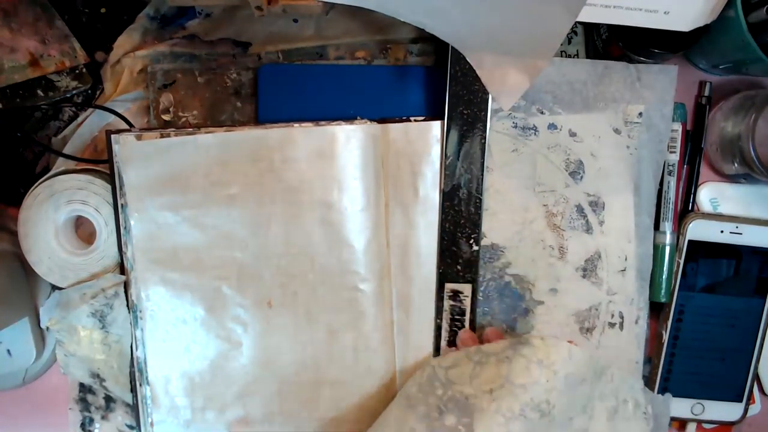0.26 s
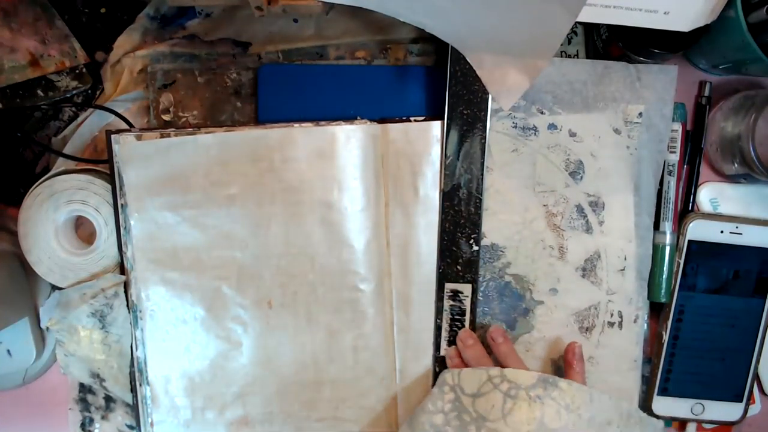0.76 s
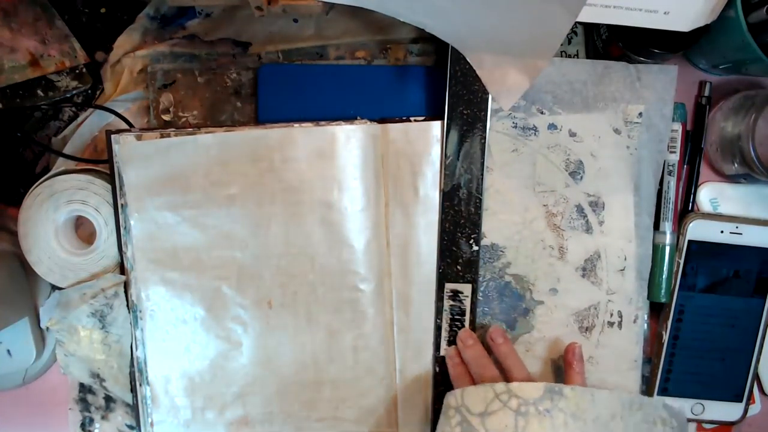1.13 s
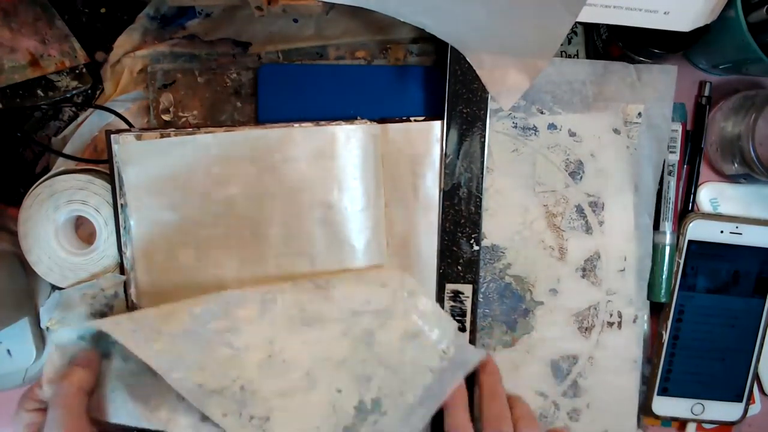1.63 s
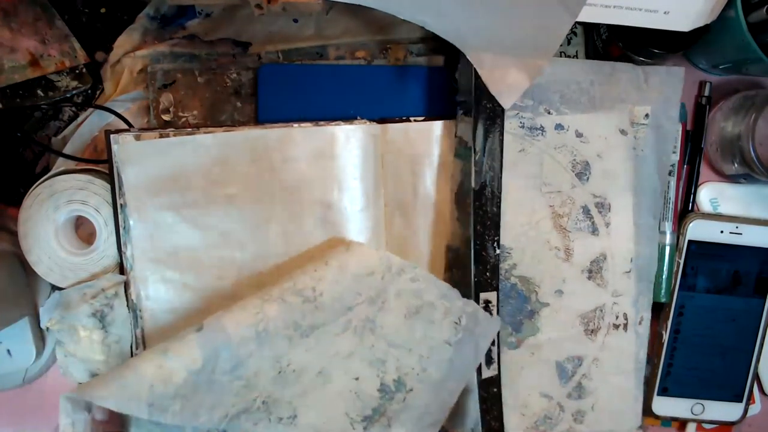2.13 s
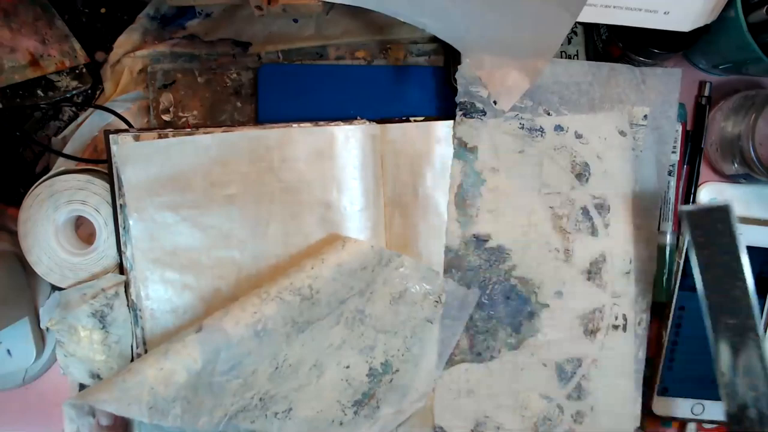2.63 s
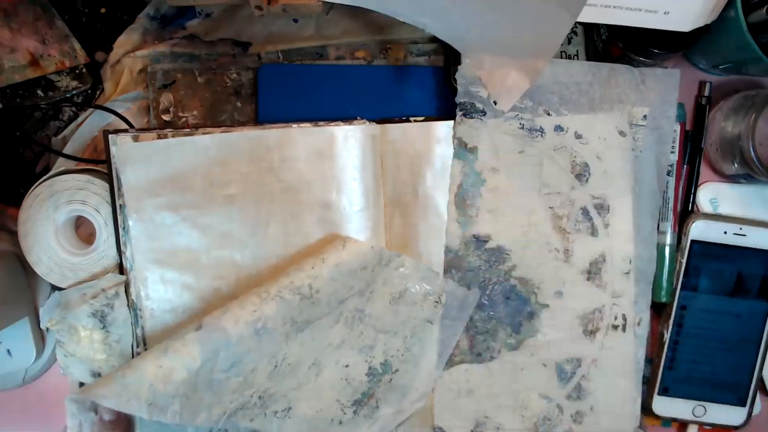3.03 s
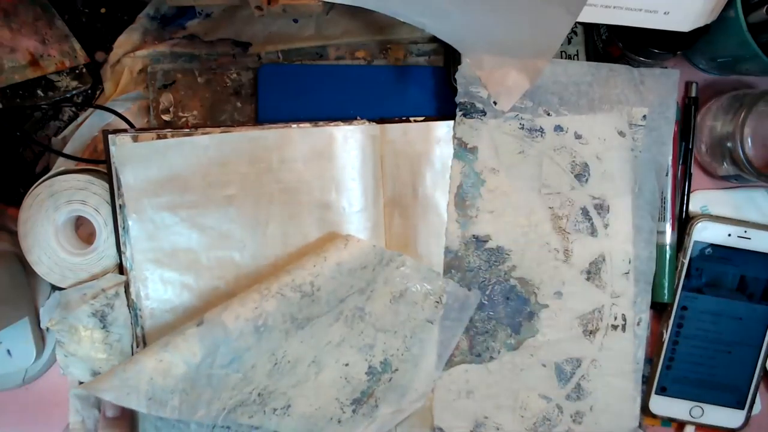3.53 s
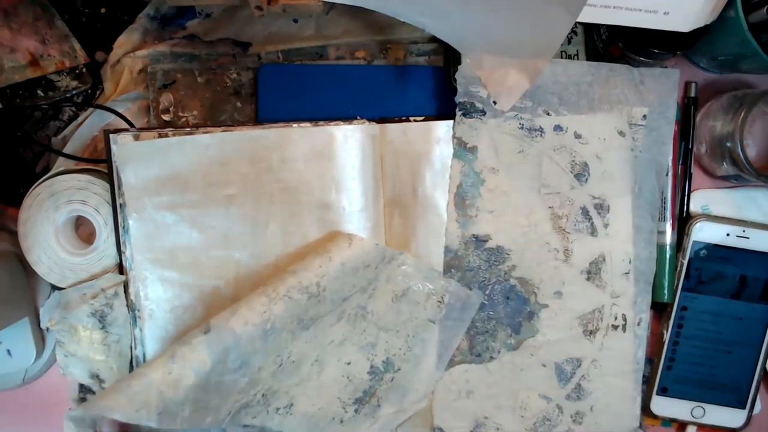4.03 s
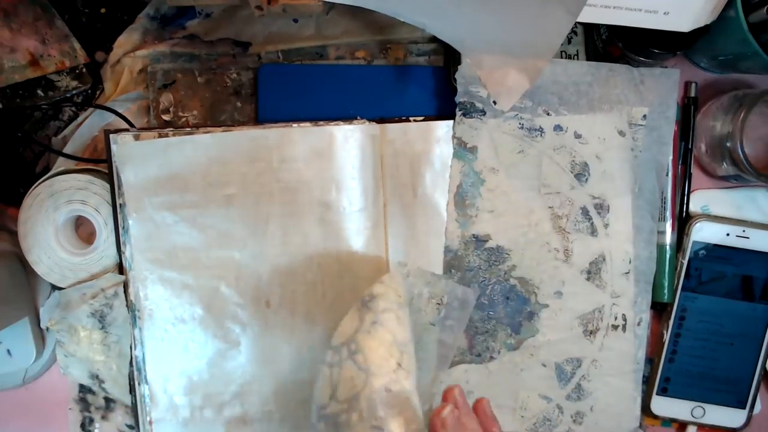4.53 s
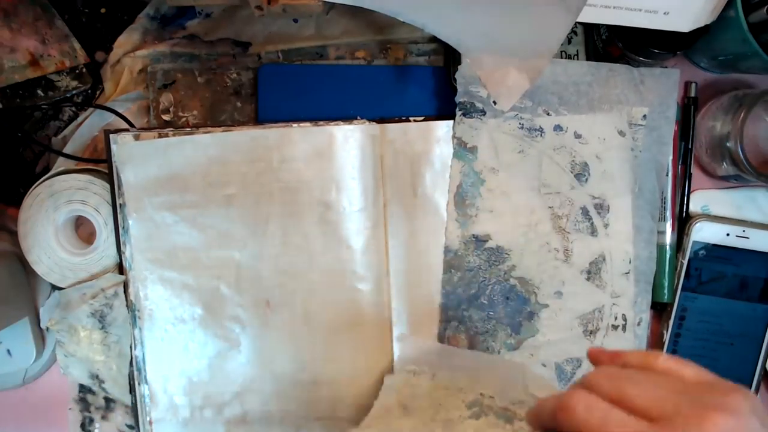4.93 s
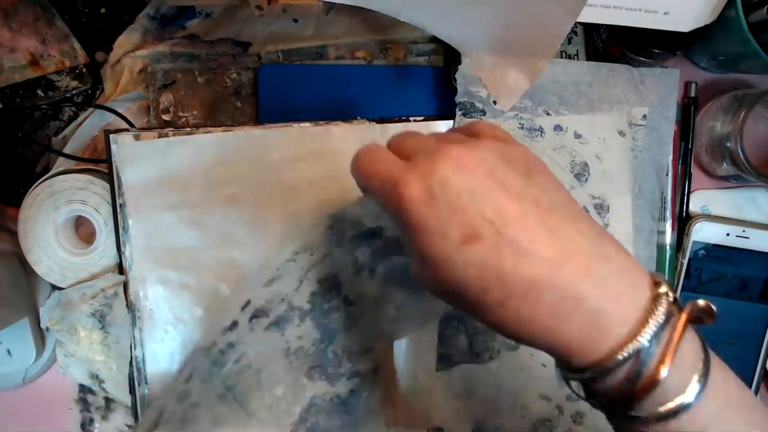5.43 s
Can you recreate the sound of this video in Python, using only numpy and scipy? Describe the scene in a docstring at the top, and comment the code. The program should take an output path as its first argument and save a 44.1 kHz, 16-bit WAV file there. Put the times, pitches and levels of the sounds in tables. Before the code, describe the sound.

A close microphone picks up work at a craft table in a small, dry room, with a very faint steady hush beneath. From 0 to 0.5 s thin paper rustles as it is gripped. At about 0.55 s comes the loudest moment, a crisp, snapping rip; after a light crackle near 0.8 s, a second tear arrives in quick bursts from 1.1 to 1.25 s. Soft rustling at 1.35 to 1.9 s lays the sheet aside. Faint metallic ticks appear from 2.1 s, with a small hollow bump and rustle near 2.4 s. Between 2.95 and 3.85 s a metal ruler rattles and scrapes down into a glass jar, clacking and ringing brightly, strongest around 3.27 s, then fading in scattered taps. It is nearly quiet until 4.5 s, when the sheet sweeps round, crackling sharply at 4.7 s. From 5.0 to 5.6 s it slides over the table in soft, breathy swishes.

```python
"""A sheet of thin paper rustles as it is gripped and bent, and is torn along a metal ruler in two short pulls.
The sheet is laid aside, things slide and bump on the table, and the ruler rattles down into a ringing glass jar.
Last, the loose sheet is swept round and slid across the table; a faint hush lies under it all in a small, dry room.
Paper is made of tiny random clicks, rubbing noise and short chirps, shaped by strokes of the hand.
Ruler, jar and table are sets of dying tones, with puffs of noise for the clacks and thuds."""
import sys
import numpy as np
from scipy import signal
from scipy.fft import rfft, irfft
from scipy.io import wavfile
from scipy.ndimage import uniform_filter1d

SR = 44100
rng = np.random.default_rng(int(sys.argv[2]) if len(sys.argv) > 2 else 0)


def master_out(mix):
    """Clip the mix to full scale and print it as 16-bit PCM to the path in sys.argv[1]."""
    frames = np.transpose(np.atleast_2d(mix))
    ceiling = np.clip(frames, -1, 1)
    pcm = np.round(ceiling * 32767).astype(np.int16)
    wavfile.write(sys.argv[1], SR, pcm)


N = 249606  # length of the scene in samples

# Levels in the tables are starting points: each layer adds its own trim in dB.
# "t60" is the time a sound takes to fall by 60 dB.

# colour of the faint background hush: (frequency [Hz], level per Hz [dB])
HUSH_COLOUR = [(18, -80), (30, -49), (86, -7.5), (121, -8.5), (287, -4.5), (319, -8), (461, -7.5),
               (526, -20), (1540, -11.5), (4780, -28.5), (16000, -37)]
# strokes that grip, bend and lay aside the sheet:
# (start [s], rise [s], hold [s], crackle [dB], flapping re crackle [dB], fibre fizz re crackle [dB])
RUSTLE_STROKES = [(0.0, 0.001, 0.02, -48, -28, -4), (0.234, 0.0097, 0.044, -34.5, -20, -13),
                  (0.338, 0.0056, 0.034, -33, -36, -19.5), (0.372, 0.047, 0.0057, -23.5, -24, -14.5),
                  (0.799, 0.019, 0.0079, -27, -49, -8.5), (0.975, 0.032, 0.011, -60, -24, -11),
                  (1.021, 0.0091, 0.0064, -37.5, -30, -3.5), (1.060, 0.02, .015, -48, -25.5, -2.5),
                  (1.345, .012, .01, -46.5, -41, 3.5), (1.365, 0.0085, 0.021, -37, -54, -10.5),
                  (1.448, 0.044, 0.015, -26.5, -29, -10), (1.490, 0.018, 0.054, -40.5, -44, -1.5),
                  (1.620, 0.017, 0.0027, -51, -19, -3), (1.688, 0.014, 0.074, -41, -30, -13.5),
                  (1.855, 0.019, 0.0045, -51, -26, -10), (2.425, 0.023, .015, -34, -25.5, -7)]
# colour of the rustling: (frequency [Hz], level per Hz [dB])
RUSTLE_COLOUR = [(35, -63.5), (60, -45.5), (146, -22), (315, -24), (1220, -6), (1340, -6), (1470, -6.5),
                 (1780, -2), (2650, 4.5), (2900, 0.5), (3580, 1.5), (5210, -3.5), (7570, -15), (10800, -16),
                 (16000, -24)]
# creases that snap over: (time [s], level [dB], centre pitch [Hz])
CREASE_SNAPS = [(0.01, -28.5, 3580), (0.236, -27.5, 1670), (0.35, -26, 3230), (0.549, -20, 1300),
                (0.575, -1, 2670), (0.606, -12, 3990), (0.739, -29, 3920), (0.902, -44.5, 4200),
                (1.034, -26, 2330), (1.05, -23, 1790), (1.176, -9.5, 1053), (1.184, -9, 2030),
                (1.358, -24.5, 6030), (1.371, -23, 5800), (1.452, -25, 4330), (1.553, -30, 5340),
                (1.627, -30, 2620), (1.706, -25, 2370), (2.551, -48, 5670), (2.659, -48, 5420),
                (4.179, -31.5, 5830), (4.3, -49, 3630), (4.513, -36, 7980), (4.599, -26.5, 1875),
                (4.687, -12.5, 4550), (4.72, -16.5, 1645), (4.943, -30.5, 1790), (5.136, -24.5, 5460),
                (5.53, -20, 3170)]
# pulls that rip the sheet:
# (start [s], rise [s], hold [s], crackle [dB], flapping re crackle [dB], fibre fizz re crackle [dB])
TEAR_STROKES = [(0.541, .010, 0.012, -21, -24.5, -12.5), (0.548, 0.02, 0.015, -14.5, -14, -15),
                (0.585, 0.014, 0.043, -16.5, -15, -4.5), (1.080, 0.027, 0.0046, -23.5, -16.5, -9),
                (1.158, 0.015, 0.025, -17.5, -14, -17), (1.195, 0.021, 0.0041, -16, -12.5, -5),
                (1.250, 0.0027, 0.0042, -19.5, -19, -6.5)]
# colour of the tearing: (frequency [Hz], level per Hz [dB])
TEAR_COLOUR = [(35, -57.5), (60, -37), (156, -12.5), (233, -16), (621, -12), (682, -17), (749, -7.5),
               (1440, -1.5), (1580, 0), (3940, -2.5), (5720, -7), (6280, -10), (7750, -11.5), (10300, -11),
               (16000, -21)]
# ruler and sheet slide over the table:
# (start [s], rise [s], hold [s], crackle [dB], flapping re crackle [dB], fibre fizz re crackle [dB])
SLIDE_STROKES = [(2.015, .015, 0.047, -73, -5.5, -19.5), (2.136, 0.0031, 0.0036, -55.5, -11, 5),
                 (2.235, 0.026, 0.053, -74.5, -6, 8), (2.493, .004, 0.003, -62.5, -26, 6),
                 (2.656, 0.0022, 0.0027, -70, -18, 16.5), (5.000, 0.027, .1, -46.5, -18.5, -16.5),
                 (5.130, .01, 0.11, -45.5, -23.5, -3), (5.180, 0.016, 0.073, -37, -27, -34),
                 (5.265, 0.026, 0.038, -35.5, -18, -24), (5.370, 0.031, 0.13, -40, -30.5, -11.5),
                 (5.560, 0.015, 0.032, -49, -18, -26)]
# colour of the sliding: (frequency [Hz], level per Hz [dB])
SLIDE_COLOUR = [(35, -63), (60, -72), (91, -39.5), (238, -29.5), (448, -43.5), (862, -36), (1170, -17.5),
                (1950, -2), (2470, 5), (3340, 2.5), (3670, 6), (5590, 3.5), (7750, -1.5), (11300, 4),
                (16000, -7)]
# main resonance of the air gap under the sliding sheet: (time [s], frequency [Hz])
GAP_PITCH = [(5.0, 3060), (5.08, 3750), (5.17, 3430), (5.25, 2720), (5.36, 2900), (5.45, 3110),
             (5.53, 3300), (5.66, 3430)]
# resonances of that gap: (factor on the main resonance [ratio], level [dB])
GAP_MODES = [(.4, -1.5), (1, 4.5), (1.75, 1)]
# the ruler knocks against things: (time [s], ring [dB], upper modes [dB], clack [dB],
# thud through the table [dB], pitch favoured by the point of contact [Hz])
RULER_KNOCKS = [(2.106, -28.5, -43.5, -67, -71, 2086), (2.151, -25.5, -57, -75, -78, 2125),
                (2.302, -37, -63, -71, -83, 2090), (2.658, -33.5, -68, -77, -73, 2367),
                (2.671, -36, -80, -82, -86, 1578), (2.949, -20.5, -26.5, -46.5, -39.5, 2100),
                (2.984, -31.5, -31, -73, -61.5, 2030), (3.084, -18.5, -13.5, -44.5, -68, 1995),
                (3.158, -27, -35, -80, -65, 2120), (3.176, -17.5, -25.5, -42, -58, 2370),
                (3.269, -11.5, -39.5, -26, -23, 2760), (3.324, -35, -46, -58, -38.5, 2000),
                (3.37, -14.5, -19.5, -40.5, -35, 1990), (3.511, -40, -30.5, -53, -71, 2000),
                (3.542, -19, -54, -34.5, -25, 1140), (3.602, -42, -32, -43, -62, 4500),
                (3.662, -58, -66, -56.5, -74, 4700), (3.705, -31.5, -68, -68, -57.5, 1845),
                (3.775, -18, -45, -56.5, -56, 2000), (3.821, -26, -40.5, -74, -51, 2008),
                (3.964, -56, -82.5, -85, -58, 1400), (4.142, -41.5, -59, -80, -81.5, 2000),
                (4.371, -53, -77, -89, -86, 2070)]
# ringing modes of the free ruler, before detuning and grip: (frequency [Hz], level [dB], t60 [s])
RULER_MODES = [(1097, -22, 0.11), (1313, -14, 0.13), (1648, -7.5, 0.081), (1946, -1, 0.088),
               (2026, -0.5, 0.11), (2240, -10.5, 0.22), (2470, -12, 0.16), (3493, -7, 0.099),
               (4530, -6, 0.037), (5100, -19.5, .08), (6220, -22.5, 0.1)]
# colour of a clack: (frequency [Hz], level per Hz [dB])
CLACK_COLOUR = [(300, -36), (700, -1.5), (1300, 7.5), (2500, 0), (5000, 1), (7000, -4.5), (11000, -11.5),
                (16000, -16.5)]
# colour of a thud: (frequency [Hz], level per Hz [dB])
THUD_COLOUR = [(30, -40), (70, -42), (110, -8.5), (160, 8), (240, 2.5), (390, -0.5), (600, -5),
               (1000, -5.5), (3000, -63)]
# modes of the table top under a knock: (frequency [Hz], level [dB], t60 [s])
TABLE_MODES = [(160, -10.5, .12), (337.6, -2.5, 0.11), (406.4, -2, 0.078), (742, -7, .1),
               (892, -6.5, 0.066), (1068, -6, 0.081), (1415, -5, 0.12)]
# the ruler scrapes over the table and down inside the jar: (start [s], rise [s], hold [s], level [dB])
SCRAPE_STROKES = [(2.15, 0.054, 0.077, -62.5), (3.082, 0.12, 0.066, -37.5), (3.305, .05, 0.029, -43),
                  (3.49, 0.026, 0.033, -49.5)]
# hollow bumps of things on the table: (time [s], level [dB], pitch [Hz])
TABLE_BUMPS = [(2.313, -66.5, 740), (2.425, -36.5, 867), (2.435, -31.5, 852), (2.931, -55.5, 535),
               (3.608, -49, 548), (3.672, -54, 801), (5.016, -41.5, 895), (5.03, -41, 843),
               (5.036, -44, 1340), (5.075, -48, 1414)]
# modes of one bump: (factor on its pitch [ratio], level [dB], t60 [s])
HOLLOW_MODES = [(.89, 4, .1), (1, 6, 0.12), (1.12, -1, .08), (1.42, -3, 0.059)]
# the ruler touches the glass:
# (time [s], ring [dB], hardness [dB per octave], time the ring takes to build [s])
GLASS_TOUCHES = [(3.179, -20, -4, 0.0026), (3.201, -16.5, -25, 0.0068), (3.238, -23.5, -13, 0.014),
                 (3.272, -10, 1, 0.00092), (3.324, -24.5, -3, 0.012), (3.379, -31, -6, .004),
                 (3.442, -28, -37, 0.042), (3.722, -51.5, -35, .012), (3.818, -40, -26, 0.0057),
                 (3.865, -38.5, -32, 0.011)]
# ringing modes of the jar: (frequency [Hz], level [dB], t60 [s])
JAR_MODES = [(400, -23, 0.13), (2727, 0.5, 0.13), (4650, -9, 0.055), (4910, -26, 0.1), (6660, -5, 0.095),
             (6850, -22, 0.14), (9700, -38.5, .09)]
# strokes that sweep the sheet round:
# (start [s], rise [s], hold [s], crackle [dB], flapping re crackle [dB], fibre fizz re crackle [dB])
SWEEP_STROKES = [(4.168, 0.0087, .015, -48.5, -33.5, -15.5), (4.425, 0.023, .005, -53.5, -22, 4.5),
                 (4.520, 0.054, 0.026, -51.5, -16, -10.5), (4.590, 0.0097, 0.16, -37.5, -33, -14),
                 (4.655, 0.017, 0.012, -26, -14, -15), (4.681, 0.0053, .008, -21.5, -13, -11.5),
                 (4.700, 0.024, 0.011, -29.5, -14, -9.5), (4.750, 0.018, 0.15, -38, -23, -10),
                 (4.930, 0.005, 0.0031, -39.5, -40, -4)]
# colour of the sweeping: (frequency [Hz], level per Hz [dB])
SWEEP_COLOUR = [(35, -51), (60, -32), (146, -25), (315, -23), (469, -20.5), (682, -22), (1150, 2),
                (1750, 11), (2410, 13), (2970, 18.5), (3760, 12), (4420, 10.5), (7570, -15.5), (9570, -17),
                (14900, -26), (16000, -27)]
# colour of the table top and microphone: (centre [Hz], width [Hz], level [dB])
TABLE_AND_MIC_COLOUR = [(171, 6, 2), (202.2, 19, -1.5), (640, 15, -2.5), (1040, 160, 2), (7650, 550, -6)]

HUSH_DB = -73
SAG_DB_PER_S, RELEASE_DB_PER_S = 41, 390.5  # fall while a stroke is held, and after it
FLAP_LAG_S, FIZZ_RELEASE_DB_PER_S = .006, 459  # the whole sheet follows late; the finest fibres stop first
GRIP = 0.87  # share of its ring time that the hand leaves the ruler
SEAT_S, EDGE_DB, EDGE_CLACK_DB = .007, -11.5, -4.5  # an edge meets first, full landing comes SEAT_S later
FRAME = 512  # samples in one short slice of spectrum
FRAME_HZ = np.fft.rfftfreq(FRAME, 1 / SR)
AGE = np.arange(SR // 2) / SR  # seconds since a sound began


def amp(db):
    """Turns decibels into a plain multiplier."""
    return 10 ** (np.asarray(db) / 20)


def evened(x):
    """Scales x to unit power."""
    return x / np.sqrt(np.mean(abs(x) ** 2) + 1e-20)


def read(points, hz):
    """Reads a colour curve at any frequency, with straight lines over log frequency."""
    f, value = np.transpose(points)
    return np.interp(np.log(hz + 1), np.log(f), value)


def add(mix, s, sound):
    """Adds a sound to the mix from time s, cut off at the end of the mix."""
    part = mix[max(round(s * SR), 0):][:len(sound)]
    part += sound[:len(part)]


def tinted(x, colour):
    """Multiplies the spectrum of x by a colour curve, then sets unit power."""
    gain = amp(read(colour, np.fft.rfftfreq(len(x), 1 / SR)))
    return evened(irfft(rfft(x) * gain, len(x)))


def band(x, lo_hz, hi_hz):
    """Keeps one band of x, its power held steady over a few hundredths of a second."""
    sos = signal.butter(4, [lo_hz, hi_hz], "band", fs=SR, output="sos")
    y = signal.sosfilt(sos, x)
    return y / np.sqrt(uniform_filter1d(y ** 2, size=1500) + 1e-12)


def stroke(rise, hold, release_db_per_s):
    """Loudness of one stroke of the hand: it swells, sags while held, and dies away."""
    sag_db = SAG_DB_PER_S * np.clip(AGE - rise, 0, hold)
    release_db = release_db_per_s * np.maximum(AGE - rise - hold, 0)
    return np.minimum(AGE / rise, 1) ** 2 * amp(-(sag_db + release_db))


def burst(colour, rise, t60, ripple_db):
    """A puff of dense contacts that swells and dies, with chance resonances of its own."""
    spectrum = rfft(rng.standard_normal(len(AGE)))
    ripple = evened(uniform_filter1d(rng.standard_normal(len(spectrum)), size=140))
    noise = irfft(spectrum * amp(ripple_db * np.clip(ripple, -2, 2)), len(AGE))
    return tinted(noise, colour) * (1 - np.exp(-AGE / rise)) * amp(-60 * AGE / t60)


def ring(modes, mode_db, rise, flutter, flutter_hz):
    """Dying tones; reflections and rattling contact make each one flutter."""
    hz, db, t60 = np.transpose(modes)[:, :, None]
    knots = np.arange(256) / flutter_hz
    wobbles = rng.standard_normal((len(modes), 2, len(knots)))
    drift = np.array([np.interp(AGE, knots, a + 1j * b) for a, b in wobbles])
    tones = np.exp(2j * np.pi * (hz * AGE + rng.random(hz.shape)))  # random starting phase
    tones = tones * (1 + flutter * drift) / np.sqrt(1 + flutter ** 2)
    decay = amp(db + mode_db[:, None] - 60 * AGE / t60)
    return (tones.real * decay).sum(0) * (1 - np.exp(-AGE / rise))


def hush():
    """Steady coloured noise: the quiet background of the room."""
    return amp(HUSH_DB) * tinted(rng.standard_normal(N), HUSH_COLOUR)


def crinkles(per_s, t60, spread_db):
    """Small facets of the sheet buckle, each ringing briefly at a pitch of its own."""
    out, t = np.zeros(N), AGE[:SR // 15]
    gaps, pitches, sizes = rng.random((3000, 3)).T
    times = np.cumsum(2 * gaps / per_s)
    pitches_hz = 1200 * 7.5 ** pitches  # 1200 to 9000 Hz
    for s, hz, size in zip(times, pitches_hz, sizes):
        if s < N / SR:
            add(out, s, amp(spread_db * size - 60 * t / t60) * np.sin(2 * np.pi * hz * t))
    return evened(out)


def fibres(per_s, spread_db, rub, patchy_db, crinkle, glance):
    """Fibres break as clicks of uneven size, facets crinkle, and the bending sheet adds drifting resonances."""
    signs = rng.choice([-1., 1.], N)
    sizes = amp(spread_db * np.minimum(rng.exponential(1, N), 4))
    clicks = signs * sizes * (rng.random(N) < per_s / SR)
    rubbing = rub * rng.standard_normal(N)
    source = evened(clicks) + rubbing + crinkle * crinkles(per_s=170, t60=.05, spread_db=15)
    z = signal.stft(source, nperseg=FRAME)[2]
    # patches of pitch and time come out louder or softer by chance
    patches = uniform_filter1d(rng.standard_normal(z.shape), size=4, axis=0)
    patches = evened(uniform_filter1d(patches, size=10, axis=1))
    # sound glancing off the table arrives a little late; the delay wanders as the sheet moves
    knots = np.arange(0, z.shape[1] + 30, 30)
    delay_s = np.interp(np.arange(z.shape[1]), knots, rng.uniform(0.00036, 0.000903, len(knots)))
    comb = 1 + glance * np.exp(-2j * np.pi * FRAME_HZ[:, None] * delay_s)
    return signal.istft(z * comb * amp(patchy_db * patches))[1][:N]


def paper(strokes, colour, grain, crackle_db, flap_db, fizz_db):
    """Each stroke drives the crackle, the low flapping of the sheet and the fizz of the finest fibres."""
    grain = tinted(grain, colour)
    flap, crackle, fizz = band(grain, 50, 700), band(grain, 700, 7000), band(grain, 7000, 16500)
    crackle_power, flap_power, fizz_power = power = np.zeros((3, N))
    for start, rise, hold, level, low, high in strokes:
        shape = stroke(rise, hold, RELEASE_DB_PER_S)
        fizz_shape = stroke(rise, hold, FIZZ_RELEASE_DB_PER_S)
        add(crackle_power, start, (amp(level + crackle_db) * shape) ** 2)
        add(flap_power, start + FLAP_LAG_S, (amp(level + low + flap_db) * shape) ** 2)
        add(fizz_power, start, (amp(level + high + fizz_db) * fizz_shape) ** 2)
    return (np.sqrt(power) * [crackle, flap, fizz]).sum(0)


def rustling():
    """Gripping and bending: clicks of fibres with many ringing facets."""
    grain = fibres(per_s=3300, spread_db=3.0, rub=0.15, patchy_db=3.06, crinkle=.36, glance=0.3)
    return paper(RUSTLE_STROKES, RUSTLE_COLOUR, grain, crackle_db=-3, flap_db=0.5, fizz_db=1.5)


def snaps(crack_db, t60, ring_db, ring_t60):
    """A crease flips over with a short, broad crack and rings its patch of paper."""
    out = np.zeros(N)
    for s, db, hz in CREASE_SNAPS:
        colour = [(hz / 8, -35), (hz / 2, -13), (hz, 0), (hz * 2, -6), (hz * 5, -16)]
        crack = burst(colour, rise=0.00025, t60=t60, ripple_db=3.5)
        add(out, s, amp(db + crack_db) * crack)
        patch = [(hz, ring_db, ring_t60)]
        add(out, s, ring(patch, np.array([db]), rise=0.0028, flutter=3.4, flutter_hz=430))
    return out


def tearing():
    """Ripping: a dense run of breaking fibres, with little crinkling."""
    grain = fibres(per_s=2600, spread_db=2.0, rub=0.28, patchy_db=1.4, crinkle=0.062, glance=0.15)
    return paper(TEAR_STROKES, TEAR_COLOUR, grain, crackle_db=-1, flap_db=0, fizz_db=-0.5)


def resonate(x, hz, width_hz):
    """A resonance of gain 1 that follows the curve hz."""
    turn = np.exp(2j * np.pi * np.cumsum(hz) / SR)
    r = np.exp(-np.pi * width_hz / SR)
    # shift the pitch down to zero, smooth, and shift it back
    return 2 * (turn * signal.lfilter([1 - r], [1, -r], x / turn)).real


def air_gap(x, width_hz):
    """The gap under the sheet opens and closes, so its resonances glide together."""
    main_hz = np.interp(np.arange(N) / SR, *np.transpose(GAP_PITCH))
    out = x.copy()
    for factor, db in GAP_MODES:
        hz = factor * main_hz
        out += amp(db) * resonate(resonate(x, hz, width_hz), hz, width_hz)
    return out


def sliding():
    """Sliding over the table: strong rubbing noise coloured by the air gap."""
    grain = fibres(per_s=1800, spread_db=5.5, rub=1.0, patchy_db=0.0, crinkle=0.63, glance=0.11)
    rubbing = air_gap(grain, width_hz=560)
    return paper(SLIDE_STROKES, SLIDE_COLOUR, rubbing, crackle_db=1, flap_db=6, fizz_db=0)


def ruler(ring_db, upper_db, clack_db, thud_db, table_db, contact_db, focus_db, uneven_db, detune):
    """Each knock rings the ruler and clacks twice, edge first, and thuds through the table."""
    out = np.zeros(N)
    hz, db, t60 = np.transpose(RULER_MODES)
    for s, low, high, clack, thud, contact_hz in RULER_KNOCKS:
        # grip and point of contact shift the modes and share out the energy anew
        shift, share = rng.uniform(-1.2, 1, (2, len(hz)))
        modes = np.transpose([hz * (1 + detune * shift), db + uneven_db * share, t60 * GRIP])
        contact = [(contact_hz, contact_db, .055)]
        # below 3000 Hz, modes far from the contact pitch ring less
        favour_db = -focus_db * abs(np.log2(hz / contact_hz))
        drive_db = np.where(hz > 3000, high + upper_db, low + ring_db + favour_db)
        for at, landing_db, landing_clack_db in [(s, EDGE_DB, EDGE_CLACK_DB), (s + SEAT_S, 0, 0)]:
            add(out, at, ring(modes, drive_db + landing_db, rise=.004, flutter=1.0, flutter_hz=167))
            contact_level = np.array([low + landing_db])
            add(out, at, ring(contact, contact_level, rise=0.0013, flutter=0.39, flutter_hz=234))
            clack_noise = burst(CLACK_COLOUR, rise=0.0033, t60=0.078, ripple_db=4.0)
            add(out, at, amp(clack + clack_db + landing_clack_db) * clack_noise)
        add(out, s, amp(thud + thud_db) * burst(THUD_COLOUR, rise=0.012, t60=0.18, ripple_db=4.5))
        table_level = np.full(len(TABLE_MODES), thud + table_db)
        add(out, s, ring(TABLE_MODES, table_level, rise=.006, flutter=.94, flutter_hz=130))
    return out


def scrape(per_s, width_hz, release_db_per_s):
    """Tiny slips of the ruler's edge keep its modes stirred."""
    slips = rng.standard_normal(N) * (rng.random(N) < per_s / SR)
    body, pressure = np.zeros((2, N))
    for hz, db, _ in RULER_MODES:
        b, a = signal.iirpeak(hz, hz / width_hz, SR)
        body += amp(db) * signal.lfilter(b, a, signal.lfilter(b, a, slips))
    for start, rise, hold, db in SCRAPE_STROKES:
        add(pressure, start, amp(db) * stroke(rise, hold, release_db_per_s))
    return evened(body) * pressure


def bumps(level_db):
    """The table top and the things on it answer a bump with a short hollow note."""
    out = np.zeros(N)
    for s, db, hz in TABLE_BUMPS:
        modes = np.array(HOLLOW_MODES) * [hz, 1, 1]
        bump_db = np.full(len(modes), db + level_db)
        add(out, s, ring(modes, bump_db, rise=0.0027, flutter=0.99, flutter_hz=127.5))
    return out


def jar(level_db, flutter, flutter_hz):
    """Touches add energy to the ringing glass; harder ones wake more modes, grazing ones build slowly."""
    out, t = np.zeros(N), np.arange(N) / SR
    knots = np.arange(2048) / flutter_hz
    main_hz = JAR_MODES[1][0]
    for hz, mode_db, t60 in JAR_MODES:
        energy = np.zeros(N)
        for s, db, hardness, rise in GLASS_TOUCHES:
            # hardness counts per octave away from the main mode, up or down
            touch_db = db + mode_db + hardness * abs(np.log2(hz / main_hz))
            add(energy, s, (amp(touch_db - 60 * AGE / t60) * (1 - np.exp(-AGE / rise))) ** 2)
        a, b = rng.standard_normal((2, len(knots)))
        drift = np.interp(t, knots, a + 1j * b)
        tone = np.exp(2j * np.pi * hz * t) * (1 + flutter * drift)
        out += np.sqrt(energy) * tone.real
    return amp(level_db) * out


def sweeping():
    """Sweeping the sheet round: sparser clicks with more rubbing and crinkling than the tearing."""
    grain = fibres(per_s=2500, spread_db=4, rub=0.59, patchy_db=0, crinkle=0.38, glance=0.36)
    return paper(SWEEP_STROKES, SWEEP_COLOUR, grain, crackle_db=-4.5, flap_db=3.5, fizz_db=8)


def room(x, wet_db, t60):
    """Sparse reflections from the table and near walls."""
    signs = rng.choice([-1., 1.], len(AGE))
    present = (rng.random(len(AGE)) < 2000 / SR) * (AGE > .002)  # about 2000 echoes a second
    taps = signs * present * amp(-60 * AGE / t60)
    return x + amp(wet_db) * signal.fftconvolve(x, taps / np.linalg.norm(taps))[:N]


def scene():
    """Paper, ruler and jar on the table, in a small, quiet room."""
    sheet = rustling() + snaps(crack_db=-14.5, t60=.03, ring_db=-3.0, ring_t60=0.053)
    sheet += tearing() + sliding() + sweeping()
    things = ruler(ring_db=-6.0, upper_db=-1.0, clack_db=11.5, thud_db=-3.5, table_db=3,
                   contact_db=-5.5, focus_db=6, uneven_db=3.0, detune=0.019)
    things += scrape(per_s=2500, width_hz=300, release_db_per_s=255.5)
    things += bumps(level_db=0.5)
    things += jar(level_db=3.5, flutter=0.203, flutter_hz=120.7)
    mix = hush() + room(sheet, wet_db=-13, t60=0.11) + room(things, wet_db=-8.5, t60=0.053)
    return mix[None]


def record(dry):
    """The colour of table and microphone, a gentle bass cut, rounded peaks, then the band limit."""
    hz = np.fft.rfftfreq(N, 1 / SR)
    colour_db = sum(db * np.exp(-((hz - centre) / width) ** 2) for centre, width, db in TABLE_AND_MIC_COLOUR)
    bass_hz, edge_hz = 48, 16100
    bass_cut = hz ** 2 / np.hypot(hz ** 2, bass_hz ** 2)
    coloured = irfft(rfft(dry) * amp(colour_db) * bass_cut, N)
    rounded = coloured / (1 + (coloured / .9) ** 8) ** (1 / 8)  # peaks stay below 0.9
    low_pass = signal.firwin(401, edge_hz, window=("kaiser", 9), fs=SR)
    return signal.oaconvolve(rounded, low_pass[None], "same")


dry = scene()
out = record(dry)
master_out(out)
```